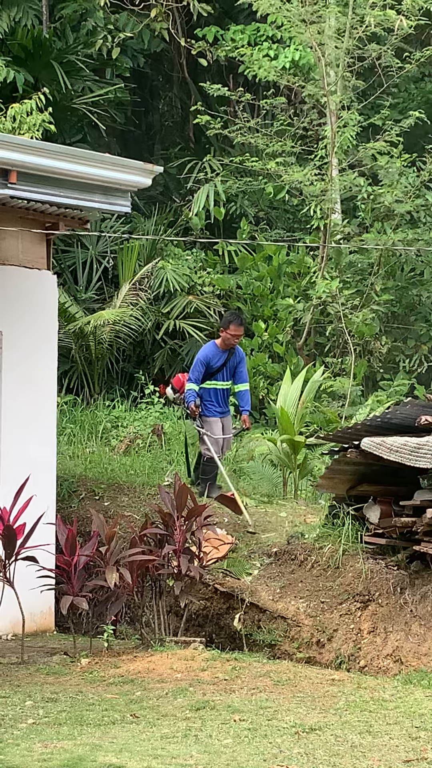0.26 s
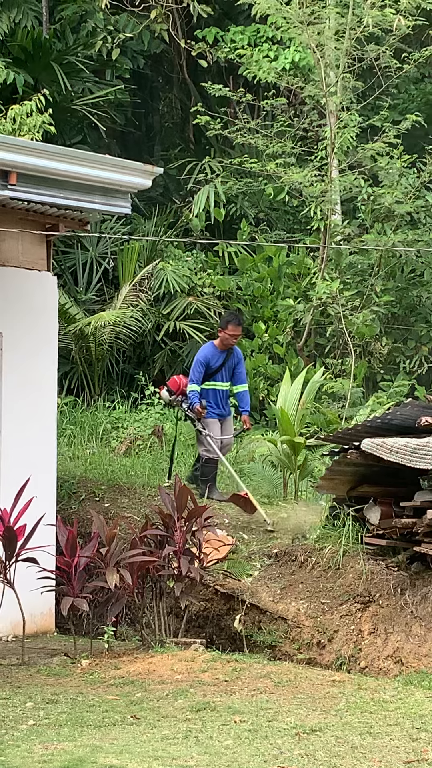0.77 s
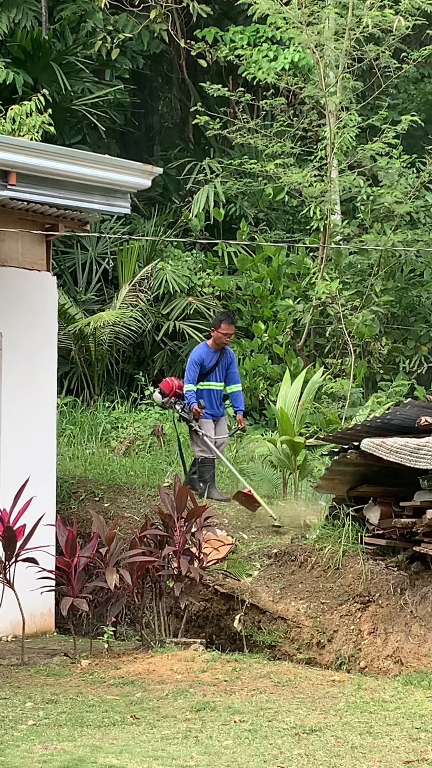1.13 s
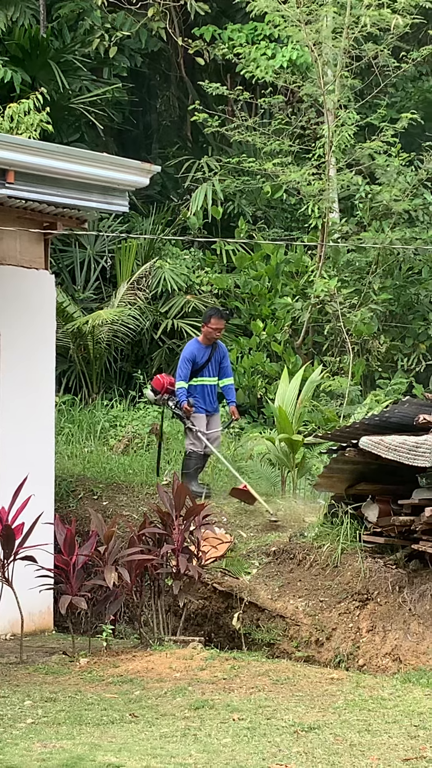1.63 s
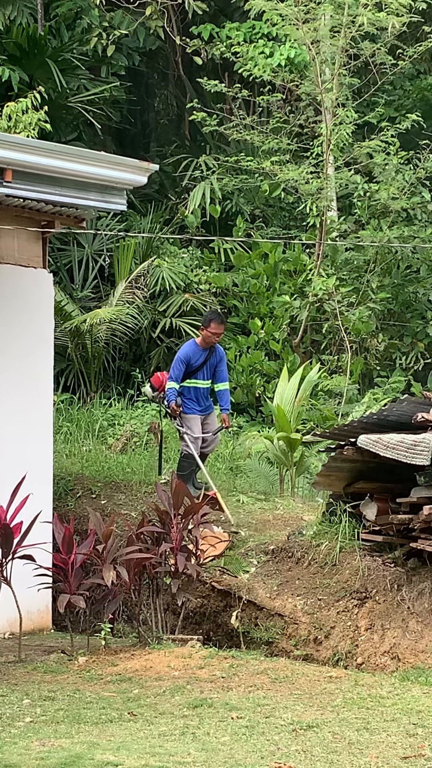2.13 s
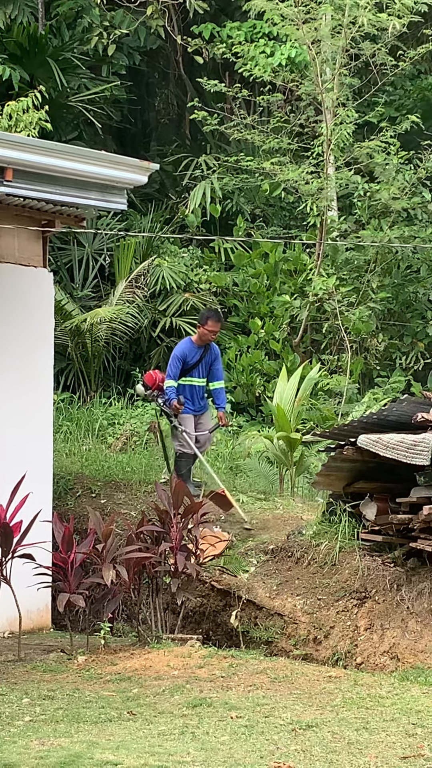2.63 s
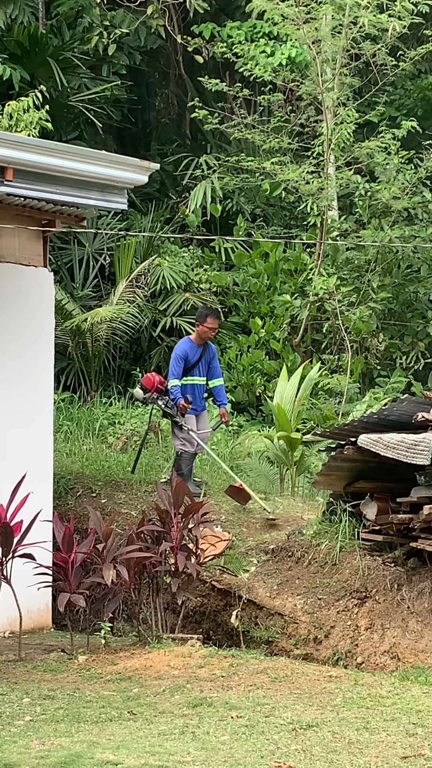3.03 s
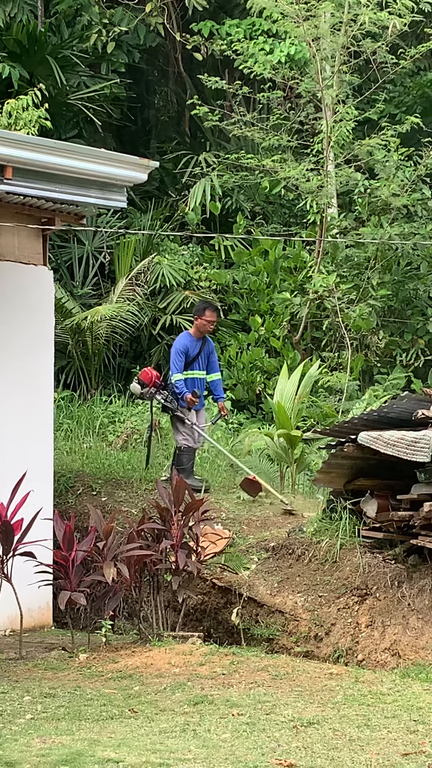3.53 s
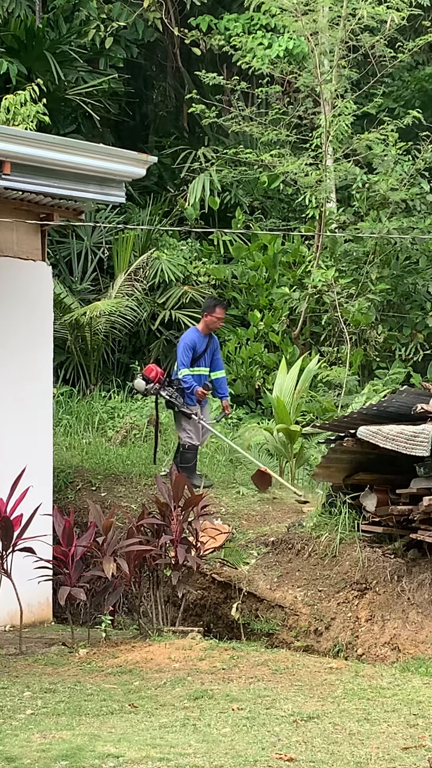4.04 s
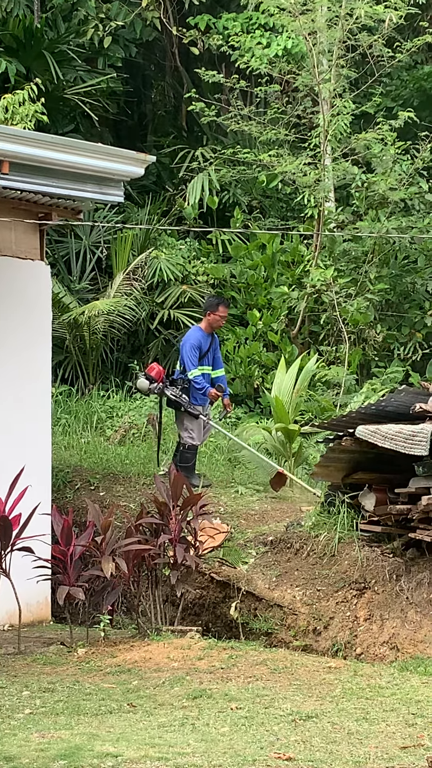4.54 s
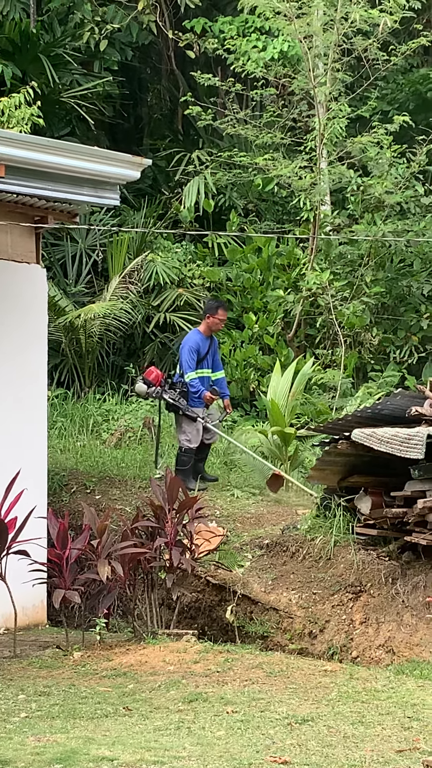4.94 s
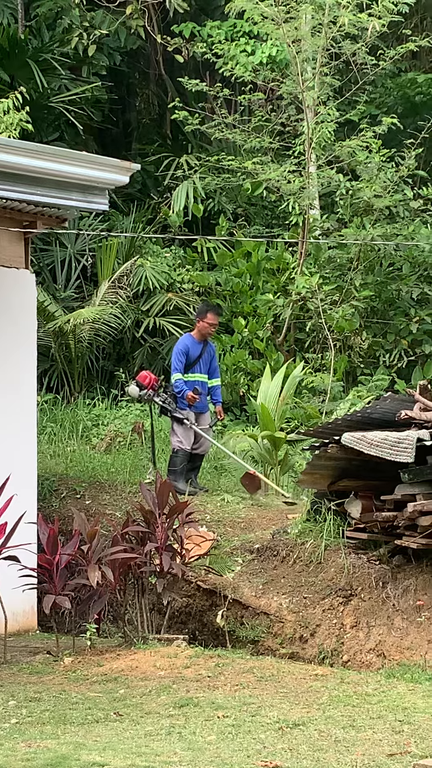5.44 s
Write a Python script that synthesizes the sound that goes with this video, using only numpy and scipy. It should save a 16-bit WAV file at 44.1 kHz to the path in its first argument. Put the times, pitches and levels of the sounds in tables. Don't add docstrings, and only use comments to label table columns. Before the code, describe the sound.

A brush cutter engine runs at a steady low throb with metallic rattle, some ten metres from a phone outdoors. Its line hisses, surging in the first second as it bites weeds, with stalks snapping. A farther cutter revs briefly early on. After lighter cutting, the line thrashes dry leaves around 4.6 to 5.2 seconds, knocking hollow stems, then the engine eases slightly.

```python
import sys
import numpy as np
from scipy import signal
from scipy.fft import rfft, irfft, next_fast_len
from scipy.io import wavfile
from scipy.ndimage import uniform_filter1d

SR = 44100
rng = np.random.default_rng(int(sys.argv[2]) if len(sys.argv) > 2 else 0)


def int16_out(signal):
    q = np.round(np.clip(np.atleast_2d(signal).T, -1, 1) * 32767)
    wavfile.write(sys.argv[1], SR, q.astype(np.int16))


def undo_db(level):
    steps = np.asarray(level, float) / 20
    return 10 ** steps


N = 250929
T = np.arange(N) / SR
SIZE = next_fast_len(N + 4096)
HZ = np.maximum(np.fft.rfftfreq(SIZE, 1 / SR), 1)


def curve(rows):
    s, *columns = np.transpose(rows)
    return [np.interp(T, s, c) for c in columns]


def across(rows, index=1):
    rows = np.array(rows)
    return np.interp(np.log(HZ), np.log(rows[:, 0]), rows[:, index])


def unit(x):
    return x / np.sqrt(np.mean(x ** 2))


def through(x, response):
    return irfft(rfft(x, SIZE) * response, SIZE)[..., :N]


def colour(x, rows):
    return unit(through(x, undo_db(across(rows))))


def band_pass(low_hz, high_hz):
    return signal.butter(2, [low_hz, high_hz], "band", fs=SR, output="sos")


def walk(rate):
    held = np.repeat(rng.standard_normal(400), 8)
    slewed = uniform_filter1d(uniform_filter1d(held, size=8), size=8)
    return 1.3 * np.interp(T * rate * 8, np.arange(len(held)), slewed)


def crackle(rate, spread_db):
    clicks = (rng.random(N) < rate / SR) * rng.standard_normal(N)
    return unit(clicks * undo_db(spread_db * rng.exponential(size=N)))


def flicker(x, depth_db, rate, low_hz, count):
    spectrum = rfft(x, SIZE)
    place = np.clip(1.5 * np.log2(HZ / low_hz), 0, count - 1)
    out = np.zeros(N)
    for p in range(count):
        band = irfft(spectrum * np.clip(1 - abs(place - p), 0, 1), SIZE)[:N]
        out += band * undo_db(depth_db * walk(rate))
    return out


def stack(turns, orders, wobble_db, rate, slip):
    out = np.zeros(N)
    for k, db in orders:
        gain = undo_db(db + wobble_db * walk(rate))
        phase = 2 * np.pi * (k * turns + rng.random()) + slip * walk(rate)
        out += gain * np.sin(phase)
    return out * np.sqrt(2)


def ring(x, hz, width):
    b, a = signal.iirpeak(hz, hz / (1.58 * width), SR)
    return signal.lfilter(b, a, signal.lfilter(b, a, x))


def swell(peak_s, db, rise, fall):
    late = T[::32, None] - peak_s
    power = undo_db(2 * db) * np.exp(2 * np.minimum(late / rise, -late / fall))
    return np.interp(T, T[::32], np.sqrt(power.sum(axis=1)))


# (time of deepest bite [s], hiss over free spin [dB], length [s])
BITES = [(-0.013, 12, 0.02), (0.348, 4.5, 0.1), (0.505, 12.5, 0.27), (0.727, 10.5, 0.3), (1.174, 6, 0.088),
         (1.29, 6.5, 0.056), (1.55, -4, 0.093), (2.083, -2, 0.16), (2.546, 4, 0.8), (2.766, 6.5, 0.081),
         (2.865, 7, .03), (2.955, 7, 0.053), (3.095, 2, 0.041), (3.169, 5.5, 0.026), (3.212, 5, 0.078),
         (3.303, 1, 0.02), (3.453, 2, 0.053), (3.89, -2, 0.067), (3.926, 4, 0.025), (4.067, 5, 0.21),
         (4.243, 7.5, .15)]


def bite_db():
    s, db, length = np.transpose(BITES)
    return 10 * np.log10(1.5 + swell(s, db, 0.93 * length, length) ** 2)


# (frequency [Hz], lead of the right for the engine [rad], likeness [0-1],
# right minus left [dB])
PORTS = [(100, 0.08, 1, 0.4), (265, -0.15, 1, 0.3), (490, 0.34, 0.91, -1.5), (870, 3, 0.32, 5.5),
         (1050, 0.5, 0.38, 7.5), (1620, 0.76, 0.33, 1.5), (1800, -1, 0.56, 3), (2510, -1.9, 0.03, 3.5),
         (3057, -0.46, 0.64, -1), (4416, -2.5, 0.89, 2.5), (7180, -7.5, .87, -2.5), (16000, -4, .9, 2.5)]


def ports(x, turn):
    like = np.clip(across(PORTS, index=2), .05, 1)
    tail = rfft(rng.standard_normal(3000) * np.exp(-np.arange(3000) / SR / .014), SIZE)
    scatter = np.angle(tail) * np.sqrt(-6 * np.log(like)) / np.pi
    tilt = undo_db(across(PORTS, index=3) / 2)
    return through(x, np.array([np.exp(1j * scatter) / tilt, np.exp(1j * turn) * tilt]))


# (time [s], firing rate [Hz], level [dB], brightest casing tone [Hz])
ENGINE = [(0.0, 38.49, -43.5, 1090), (0.32, 40.67, -43, 1110), (0.63, 40.2, -43.5, 1010),
          (0.86, 39.42, -43, 1080), (1.09, 40.07, -41, 1050), (1.49, 39.04, -42.5, 1010),
          (2.3, 39.33, -42.5, 1140), (2.64, 40, -42.5, 1040), (3.49, 38.82, -42.5, 1075),
          (3.85, 39.17, -42.5, 1090), (4.02, 40.08, -42.5, 1030), (4.36, 39.5, -41, 1040),
          (4.64, 39.91, -42, 930), (4.9, 39.2, -40, 1130), (5.15, 39.31, -40.5, 1040),
          (5.29, 37.72, -42.5, 1125), (5.69, 38.04, -46.5, 1090)]
# (multiple of the firing rate [1], level [dB])
ENGINE_ORDERS = [(1, -33), (3, -21.5), (4, -23), (6, -12.5), (7, -12.5), (8, -24), (9, -36), (10, -26),
                 (13, -17.5), (14, -33), (15, -14.5), (16, -22.5), (17, -21.5), (18, -16.5), (19, -25.5),
                 (20, -26), (21, -21.5), (22, -33), (23, -11), (24, -16), (25, -15), (26, -15.5), (28, -16),
                 (29, -18.5), (30, -20), (31, -10)]
# (frequency [Hz], width [Hz], level [dB])
CASING = [(500, 21, -16), (918, 35, -2), (975, 61, 4.5), (1096.4, 49, 1), (1160, 26.4, 7), (1320, 42, 1),
          (1820, 96, 0.5), (2910, 96, 1)]
# (frequency [Hz], level [dB])
GAS = [(40, -3), (90, -4), (150, -3.5), (400, -5), (560, -8.5), (780, -9.5), (950, -4.5), (1400, -6),
       (1900, -3), (2500, -5.5), (3100, -3.5), (4300, -4.5), (7000, -19.5)]
# (time [s], exhaust throb level [dB])
OUTLET = [(0.0, -42), (0.22, -42), (0.47, -43), (0.52, -43), (0.66, -45), (0.79, -36), (0.84, -41.5),
          (2.33, -43), (2.47, -37), (2.62, -48.5), (2.93, -38.5), (3.49, -42), (4.58, -42), (4.63, -45),
          (4.82, -39.5), (4.88, -45), (5.64, -43.5), (5.69, -42)]
# (time [s], shell tone on the 12th multiple [dB], on the 11th [dB],
# pipe tone on the 5th [dB])
MUFFLER = [(0, -12, -21, -6), (.14, -6.5, -11, -7), (.22, -17, -24, -6), (.7, -11, -12, -15),
           (.85, -5.5, -29, -9.5), (1.09, -9, -20, -8.5), (1.17, -13, -28, -11), (1.45, -9.5, -8.5, -4.5),
           (1.85, -11, -10, -5), (2.0, -7.5, -15, -5), (2.4, -6, -13, -6.5), (3.25, -6, -12.5, -8),
           (3.5, -13, -23, -5), (3.7, -5, -12, -8), (4.3, -5, -24, -9.5), (5.15, -4, -24, -6),
           (5.29, -16, -16, -8), (5.69, -13, -22, -9)]
# (time [s], frequency [Hz], level against the engine [dB], length [s])
BUZZES = [(0.323, 1020, -20, .04), (0.472, 1103, 5, 0.087), (0.601, 2175, 2.5, 0.075),
          (0.78, 1133, 2.5, 0.059), (0.98, 2890, 5, 0.047), (1.182, 965, -7, 0.043),
          (1.263, 3080, 0, 0.024), (1.413, 2080, -5, 0.065), (2.174, 1086, -2, 0.059),
          (3.973, 1160, -1, 0.1), (4.15, 1160, -5, .1), (4.35, 1146, -7, 0.12), (4.604, 1160, -5, .12),
          (3.55, 975, -6, .15), (2.5, 990, -6, .15), (1.747, 967, -9.5, .15), (5.397, 1153, -5, 0.087),
          (5.52, 1343, -4, .08), (5.6, 1203, -4, .08)]


def engine():
    hz, level_db, facing_hz = curve(ENGINE)
    turns = np.cumsum(hz) / SR
    beats = np.flatnonzero(np.diff(np.floor(2 * turns)))
    chance = rng.standard_normal((600, 2))[:len(beats)]
    valve_stroke = np.arange(1, len(beats) + 1) % 2
    size_db = 2.0 * chance[:, 1] - 9.5 * valve_stroke
    jitter = (.00018 * SR * chance[:, 0]).astype(int)
    knocks = np.zeros(N)
    knocks[np.clip(beats + jitter, 0, N - 1)] = undo_db(size_db)

    rattle = np.zeros(N)
    for f, width, db in CASING:
        facing_db = 8.5 * np.exp(-((f - facing_hz) / 70) ** 2)
        rattle += undo_db(db + facing_db) * ring(knocks, f, width)
    rattle = unit(rattle)

    puff = 1 + .9 * np.exp(-(turns % 1) / .25)
    gas = flicker(colour(puff * rng.standard_normal(N), GAS), 1.13, 9.0, low_hz=320.0, count=6)
    lines = stack(turns, ENGINE_ORDERS, 1.3, 9.0, 0.63)
    lines = lines + stack(turns, zip((12, 11, 5), curve(MUFFLER)), 2.07, 13.0, 0.86)
    throb = stack(turns, [(2, curve(OUTLET)[0])], 1.0, 9.8, 0.42)

    shaken = knocks + 0.049 * rng.standard_normal(N)
    buzz = np.zeros(N)
    for s, f, db, length in BUZZES:
        buzz += swell(np.array([s]), db, length, length) * unit(ring(shaken, f, 28.0))

    bite = bite_db()
    rattle_db = -3 + 0.23 * bite + 1.5 * walk(6.83)
    gas_db = 4.5 + 0.17 * bite
    return throb + undo_db(level_db) * (lines + buzz + undo_db(rattle_db) * rattle + undo_db(gas_db) * gas)


SPIN_DB = 5.5
# (frequency [Hz], level [dB])
HISS = [(2500, -19), (4000, -5), (5500, 0.5), (7000, -1), (8800, -0.5), (11000, -4), (13000, -4),
        (15500, -9.5), (16500, -7)]
# (time [s], extra treble of the hiss [dB])
SWING = [(0, -5), (.3, 1.5), (.9, 0), (1.3, 2), (1.5, 4), (1.9, -2.8), (2.1, 1.5), (2.5, -2.5), (3.1, -0.4),
         (3.5, 2.5), (3.85, 2), (4.0, 0), (4.2, 0), (4.5, -0.2), (5.1, -0.5), (5.4, -1), (5.69, -4)]


def whip():
    wobble = 2 * np.pi * 17.0 * T + 4.2 * walk(4.0)
    throb = undo_db(1.14 * np.sin(wobble) + 0.79 * walk(24.78))
    grains = rng.standard_normal(N) + .5 * crackle(2500., 2.0)
    hiss = flicker(colour(grains, HISS), 0.83, 13.0, low_hz=2700.0, count=5)
    shade_hz = 8000.
    treble = through(hiss, HZ ** 6 / (HZ ** 6 + shade_hz ** 6))
    swung = hiss + (undo_db(curve(SWING)[0]) - 1) * treble
    return undo_db(curve(ENGINE)[1] + SPIN_DB + bite_db()) * throb * swung


def garden():
    roar = [colour(rng.standard_normal(N), GAS) for _ in range(2)]
    roar = signal.sosfilt(band_pass(386, 2700), roar)
    rustle = np.array([colour(rng.standard_normal(N), HISS) for _ in range(2)])
    bite = bite_db()
    roar_db = 1 + 0.17 * bite
    rustle_db = SPIN_DB - 18.5 - 1.0 + 0.77 * bite
    return undo_db(curve(ENGINE)[1]) * (undo_db(roar_db) * roar + undo_db(rustle_db) * rustle)


# (time [s], peak level [dB], brightest frequency [Hz])
SNAPS = [(0.0083, -10, 9500), (0.1595, -17, 9200), (0.3101, -32, 8900), (0.4738, -5, 9500),
         (0.5374, -9, 10300), (0.6476, -12, 10100), (0.703, -7, 8900), (1.0442, -9.5, 6950),
         (1.0692, -5, 10100), (1.0872, -7, 9100), (1.1615, -9, 10890), (1.185, -9, 8500),
         (1.1959, -15, 9300), (1.2524, -5.5, 8651), (1.2981, -17, 8000), (1.3255, -13, 8300),
         (1.35, -14, 8500), (1.4324, -17, 8900), (1.4615, -7, 10300), (1.4902, -13, 9300),
         (1.552, -18, 9800), (2.0175, -16, 7500), (2.5576, -15.5, 7100), (2.778, -13, 6300),
         (3.1643, -12, 7240), (3.1769, -15, 10700), (3.2033, -25, 8600), (3.2196, -15, 8550),
         (3.2856, -16.5, 9400), (3.2937, -22, 9000), (3.3034, -9, 8800), (3.311, -18, 8900),
         (3.9132, -15, 8500), (3.9416, -14, 10000), (4.0654, -22, 7000), (4.2041, -12, 11700),
         (4.6338, -17, 9950), (4.775, -1, 10740), (4.787, -18, 10000), (4.8366, -4, 11300),
         (4.8474, -15, 10300), (4.9648, -9.5, 9900), (4.9777, -16, 10000), (5.0927, -18, 9900),
         (5.0978, -14, 10000), (5.362, -7.5, 9200)]


def snaps():
    crack_s, rustle_s, rustle_share = .00035, .004, .16
    out, t = np.zeros(N + 2000), np.arange(2000) / SR
    decay = np.exp(-t / crack_s) + rustle_share * np.exp(-t / rustle_s)
    band = band_pass(3500, 15500)
    for (s, db, hz), noise in zip(SNAPS, rng.standard_normal((60, 2000))):
        crack = signal.sosfilt(band, noise * decay)
        crack = crack + 1.8 * ring(crack, hz, 2100.0)
        start = int(s * SR)
        out[start:start + 2000] += undo_db(db - 0.5) * crack / abs(crack).max()
    return out[:N]


# (time [s], shaft rate [Hz], level [dB])
FAR = [
    (.1, 81.8, -63),
    (.3, 92.06, -38.5),
    (.43, 100.1, -37.5),
    (.66, 99.3, -38),
    (.85, 92.8, -42),
    (.95, 85.65, -61),
    (1.15, 87.3, -46.5),
    (1.3, 87.2, -39),
    (1.5, 80, -66),
]
# (multiple of the shaft rate [1], level [dB])
FAR_ORDERS = [(1, -5.5), (2, -15), (3, -14), (4, -33)]


def far_cutter():
    hz, db = curve(FAR)
    turns = np.cumsum(hz) / SR
    puffs = np.exp(-(turns % 1) / 0.5) * rng.standard_normal(N)
    growl = unit(signal.sosfilt(band_pass(220, 650), puffs))
    buzz = unit(ring(puffs, 1092.0, 63.0))
    lines = stack(turns, FAR_ORDERS, 0.74, 16.9, 0.37)
    running = T < FAR[-1][0]
    return undo_db(db) * (lines + undo_db(-5.0) * growl + undo_db(-2.5) * buzz) * running


# (time of peak [s], hiss level [dB], body level [dB], rise [s], fall [s])
STROKES = [
    (4.637, -23.5, -43, 0.0066, 0.033),
    (4.773, -14.5, -24, 0.0098, 0.028),
    (4.843, -12.5, -28.5, 0.013, 0.018),
    (4.9, -27.5, -64, 0.021, 0.064),
    (4.967, -14.5, -26.5, 0.0085, 0.015),
    (5.023, -17.5, -32, 0.047, 0.035),
    (5.097, -17, -27, 0.0083, 0.027),
    (5.156, -20, -33, 0.036, 0.031),
]
# (frequency [Hz], level [dB])
LEAF = [(1500, -11.5), (3000, -6), (4800, -1), (6500, -2), (8000, 0), (10500, 1.5), (12500, -1),
        (14500, -6.5), (16500, -20)]
# (frequency [Hz], level [dB])
THUMP = [(150, -23), (260, -12), (470, 0.5), (650, -4.5), (900, 6), (1150, 5), (1500, 2.5), (1900, -3),
         (3000, -8), (5000, -9.5)]


def strokes():
    s, hiss_db, body_db, rise, fall = np.transpose(STROKES)
    leaf = colour(rng.standard_normal(N) + .45 * crackle(4000., 1.5), LEAF)
    thump = colour(rng.standard_normal(N) + 0.3 * crackle(600., 1.9), THUMP)
    crisp = swell(s, hiss_db, rise, fall) * flicker(leaf, 1.442, 30.0, low_hz=2520.0, count=5)
    body = swell(s, body_db + 4.0, rise, 2.7 * fall) * thump
    return crisp + body


# (time [s], ringing frequency [Hz], level [dB], rise [s], fall [s])
THUDS = [(4.771, 1060, -24, 0.0063, 0.017), (4.787, 491, -35.5, .006, 0.019),
         (4.797, 1183, -26, .01, 0.018), (4.812, 1000, -29, 0.0045, .006), (4.85, 1128, -35, .015, 0.024),
         (4.85, 476, -42, 0.011, 0.013), (4.96, 1650, -36, .004, 0.0049), (4.968, 1092, -31, 0.0066, .015),
         (4.98, 512, -35, 0.0039, 0.0073), (4.992, 1050, -33, .006, 0.0053),
         (5.018, 431, -34.5, .005, 0.018), (5.022, 1203, -34, .006, .01), (5.095, 1160, -30, 0.0035, .012),
         (5.108, 1060, -33, 0.0061, .008), (5.1, 905, -34, .005, .01), (5.113, 542.5, -32, 0.0053, .008),
         (5.125, 1027, -28, .006, 0.011), (5.13, 1250, -35, .006, 0.018)]


def thuds():
    out = np.zeros(N)
    for s, hz, db, rise, fall in THUDS:
        tone = stack(hz * T, [(0.98, 2.1)], 1.1, 60., .9)
        out += swell(np.array([s]), db, rise, fall) * tone
    return out


def scene():
    low = ports(engine() + far_cutter(), across(PORTS))
    lag_s, turn = 10.37 / SR, 3.73
    lag = (turn - 2 * np.pi * HZ * lag_s) * HZ ** 4 / (HZ ** 4 + 600. ** 4)
    head = ports(whip() + snaps() + strokes() + thuds(), lag)
    return low + head + garden()


BAND_EDGES = np.r_[196, 216, 240, 264, 292, 320:768:32]
SUDDEN_S = np.array([.16, 1.065, 1.088, 1.46, 3.294, 3.317, 4.826, 4.966, 5.082, 5.36])


def thin_weaker(x, gap_db, slope_db, flutter_db):
    frame = dict(window="cosine", nperseg=2048, noverlap=1024)
    lead = 145
    pair = np.pad([x[0] + x[1], x[0] - x[1]], ((0, 0), (lead, 0))) / 2
    spectrum = signal.stft(pair, **frame)[2]
    sudden_frames = np.round((SUDDEN_S * SR + lead) / 1024)
    steady = ~np.isin(np.arange(spectrum.shape[2]), sudden_frames)
    for a, b in zip(BAND_EDGES[:-1], BAND_EDGES[1:]):
        power = (abs(spectrum[:, a:b]) ** 2).sum(axis=1)
        margin_db = gap_db - slope_db * a / 100 + flutter_db * rng.standard_normal(len(steady))
        silenced = steady & (power < power[::-1] * undo_db(-2 * margin_db))
        spectrum[:, a:b] *= 1 - silenced[:, None]
    spectrum[:, 736:] *= .2 * ~steady
    spectrum[:, 770:] = 0
    mid, side = signal.istft(spectrum, **frame)[1][:, lead:lead + N]
    return np.array([mid + side, mid - side])


def top_cut(x):
    return signal.sosfilt(signal.butter(12, 16840, fs=SR, output="sos"), x)


def record(dry):
    dry = signal.sosfilt(signal.butter(4, 40, "high", fs=SR, output="sos"), dry)
    mix = thin_weaker(dry, gap_db=8.0, slope_db=1.0, flutter_db=1.71)
    return top_cut(mix)


dry = scene()
out = record(dry)
int16_out(out)
```